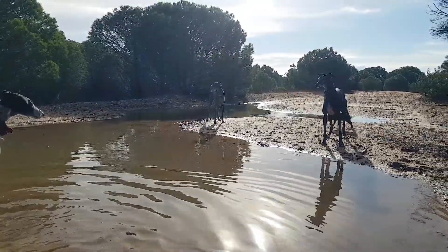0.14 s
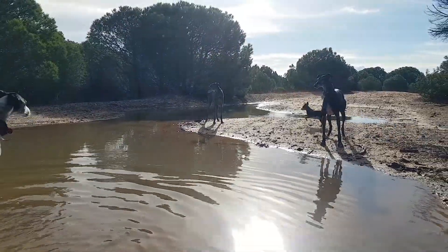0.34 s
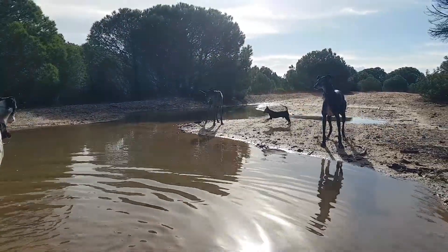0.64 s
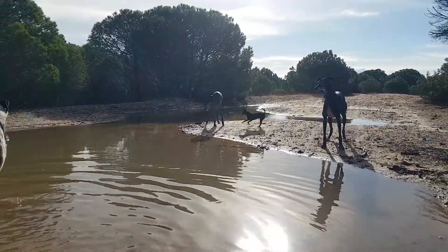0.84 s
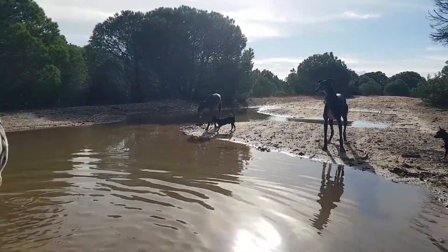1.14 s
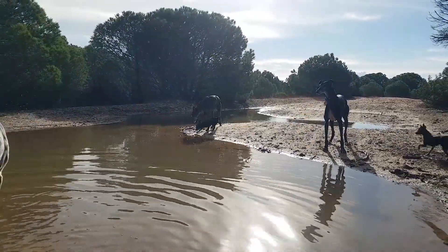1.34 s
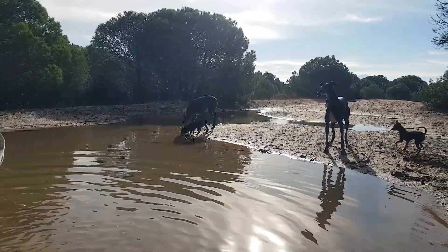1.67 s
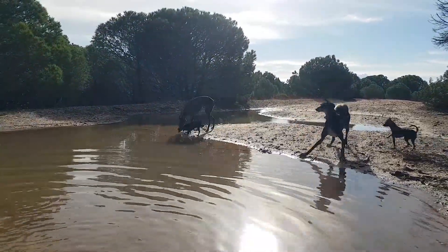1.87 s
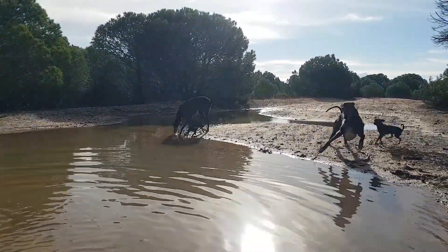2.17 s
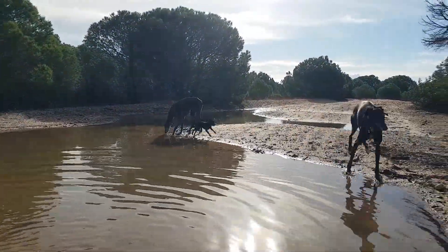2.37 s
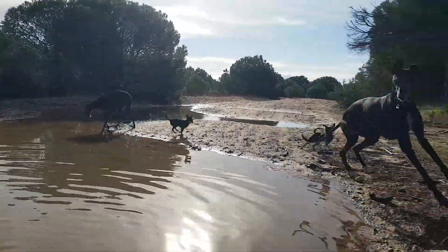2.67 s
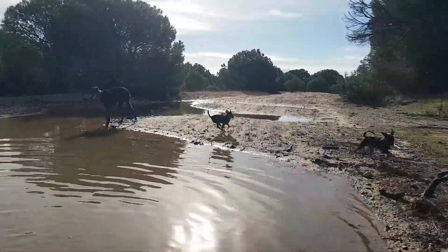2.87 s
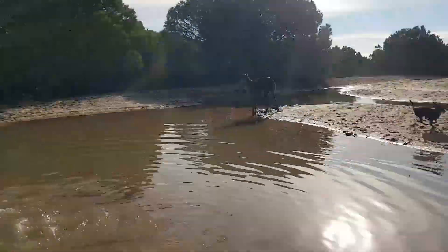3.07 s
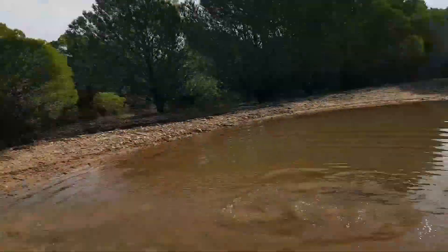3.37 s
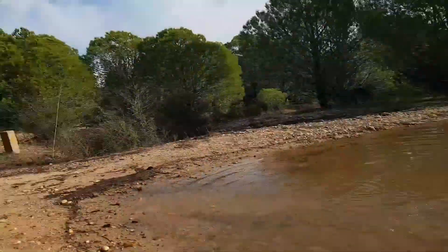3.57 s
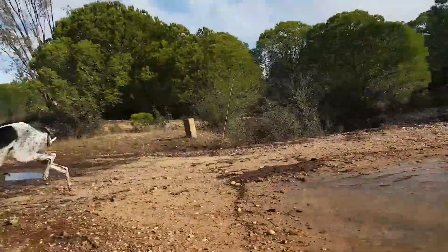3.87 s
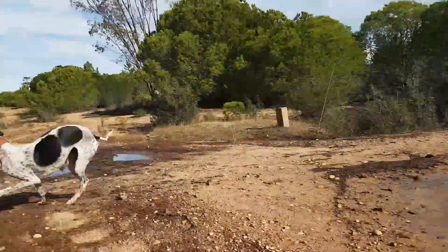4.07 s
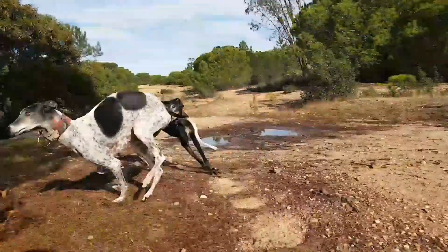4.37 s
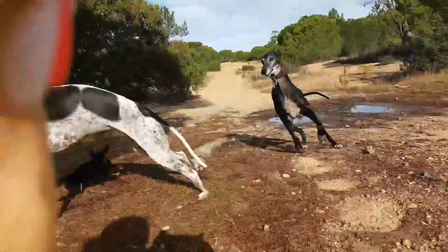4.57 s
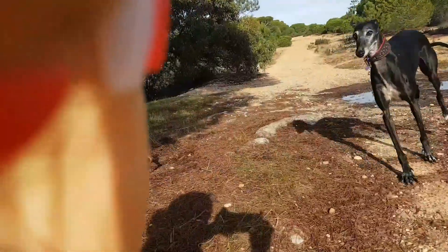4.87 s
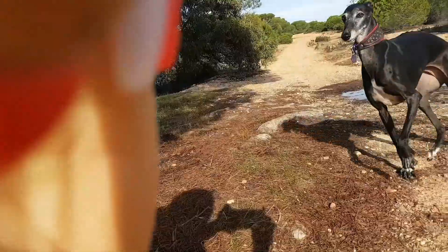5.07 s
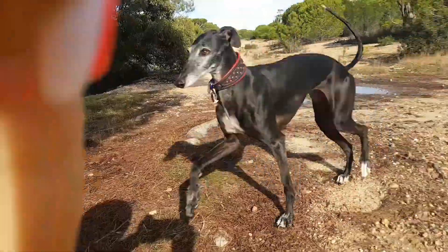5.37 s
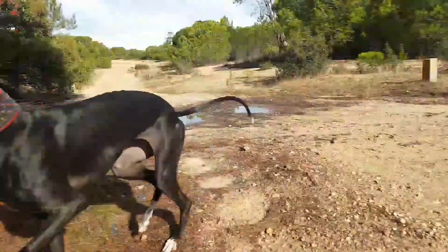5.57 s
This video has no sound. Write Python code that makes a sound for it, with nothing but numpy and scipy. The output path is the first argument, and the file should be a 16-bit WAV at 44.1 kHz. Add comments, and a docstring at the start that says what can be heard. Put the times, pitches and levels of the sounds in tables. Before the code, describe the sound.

A quiet open-air start with soft wind, then four dry lip smacks right at the microphone. A squealing yelp breaks out, followed by splashing paws, pattering drops, snapping grit and light metallic tag jingles. After a dull handling thump and rub on the left, the dog yelps three more times among low woofs, while jingling and footfalls thin out.

```python
"""A dog gives four high yelps, squeals that break out of a chest voice, and some gruff woofs.
Dogs play at a shallow puddle on sandy ground: paws slap, grit snaps, spray patters and collar tags jingle.
Four lip smacks beside the microphone call them, as fluttering grains that ring the modes of a mouth.
A finger bumps and rubs the left microphone port; light wind, made of coloured noise, rumbles underneath."""
import sys
import numpy as np
from scipy import signal
from scipy.fft import rfft, irfft, next_fast_len
from scipy.io import wavfile
from scipy.ndimage import uniform_filter1d

SR = 44100
rng = np.random.default_rng(int(sys.argv[2]) if len(sys.argv) > 2 else 0)


def put_to_file(sound):
    """Save the sound as 16-bit audio at rate SR, in the file named by the first command-line argument."""
    columns = np.atleast_2d(sound).T  # one column per channel
    safe = np.clip(columns, -1, 1)
    whole_steps = np.round(safe * 32767)
    wavfile.write(sys.argv[1], SR, whole_steps.astype(np.int16))


N = 252252
TIME = np.arange(N) / SR
SIDES = np.array([[.5], [-.5]])  # shares a left-right level difference between the ports

# Yelps that start in the chest, break into a squeal and arch in pitch:
# (time of the top [s], top pitch before any cling [Hz], rise [s], fall [s], cling to the throat resonance [0-1],
#  time of the break [s], burst at the break [dB], chest level [dB], chest pitch [Hz], chest roughness [0-1],
#  lower throat level [dB], upper throat level [dB], roughness [0-1], half-pitch share [0-1],
#  left lag [samples], left-right difference of the lower throat [dB])
YELP_EVENTS = [(2.15, 1691, .058, .058, 0, 2.117, 17, -41, 425, .6, -28, -19, .22, .15, 8, 2.5),
               (4.106, 1657, .04, .075, .8, 4.094, 4, -31, 354, .4, -18.5, -20.5, .06, 0.06, -17.5, 2.5),
               (4.474, 1351, .095, .066, 0, 4.467, 12, -30, 378, .05, -24, -31, .12, .5, -9.5, -0.5),
               (4.678, 1265, 0.077, 0.077, 0.01, 4.659, 1, -32, 402, .42, -18, -21.5, .06, .55, -13, -7)]
# Gruff woofs: (time of the peak [s], level [dB], rise [s], pitch at the peak [Hz],
#  mouth opening [factor on the chest resonance])
WOOF_EVENTS = [(.539, -42, 0.0083, 301.6, 1.16), (4.29, -31, 0.0083, 321, 1.33),
               (4.334, -39.5, .018, 276.5, 1.2), (4.554, -38.5, .022, 271.6, 0.92),
               (4.588, -36, .012, 313.4, 1.9), (4.995, -39, .04, 298.5, 1.3),
               (5.096, -42.5, 0.022, 240.2, 1.1), (5.645, -41, .016, 265.4, 1.07)]
WOOF_ROUGHNESS = 0.54  # 0-1


def dog(chest_mouth=1.1, return_mouth=1.4, woof_fall_s=0.035):
    """High yelps that break out of the chest voice and sink back into it, and low woofs."""
    out = np.zeros((2, N))
    for (top_s, top_hz, rise, fall, cling, break_s, burst_db, chest_db, chest_hz, chest_rough,
         low_db, high_db, rough, half, lag, pan_db) in YELP_EVENTS:
        # The chest voice peaks just before the break
        chest = woof(break_s - .012, chest_db, .6 * rise, 0.014, chest_hz, chest_rough, chest_mouth)
        add(out, *chest, lag)
        add(out, *squeal(top_s, top_hz, rise, fall, cling, break_s, burst_db,
                         low_db, high_db, rough, half, pan_db), lag)
        # It returns briefly, more quietly, late in the fall
        back = woof(top_s + .82 * fall, chest_db - 6, .012, .024, 330, WOOF_ROUGHNESS, return_mouth)
        add(out, *back, lag)
    yelp_times = [row[0] for row in YELP_EVENTS]
    yelp_lags = [row[-2] for row in YELP_EVENTS]
    for s, db, rise, hz, mouth in WOOF_EVENTS:
        lag = np.interp(s, yelp_times, yelp_lags)  # the same dog, on its way
        add(out, *woof(s, db, rise, woof_fall_s, hz, WOOF_ROUGHNESS, mouth), lag)
    return out


# Lower throat resonance: (frequency [Hz], gain [dB])
LOWER_THROAT = [(200, -26), (500, -4.5), (900, -1.5), (1250, 4), (1700, -3.5), (2000, -9.5), (2500, -36)]
# Upper throat resonance: (frequency [Hz], gain [dB])
UPPER_THROAT = [(1400, -55.5), (1900, -0.5), (2400, -1.5), (2900, 1), (3400, -1.5), (4100, -22.5),
                (5300, -22), (7000, -32.5), (15000, -48)]
# Air through the teeth: (frequency [Hz], gain [dB])
TEETH_RASP = [(2500, -24.5), (3500, 6.5), (4300, -8.5), (5400, -11.5), (6500, -11.5), (8000, -13.5),
              (15000, -19.5)]
CLING_HZ, CLING_RANGE_HZ = 1423, 251  # near this pitch the second harmonic locks to the upper throat
BREAK_S, HALF_PITCH_S = 0.0054, .028  # spread of the burst at the break, and of the half pitch round it


def squeal(top_s, top_hz, rise, fall, cling, break_s, burst_db, low_db, high_db, rough_top, half_top,
           pan_db, flutter_db=1.0, rasp_db=-25, high_pan_db=1.5, unbroken_db=-2):
    """A squeal that arches in pitch; the upper resonance takes over as the mouth opens."""
    t = np.arange(top_s - 1.2 * rise, top_s + 1.15 * fall, 1 / SR)
    u = (t - top_s) / np.where(t < top_s, rise, fall)  # -1 to 0 in the rise, 0 to 1 in the fall
    hz = top_hz * np.exp(-u ** 2)
    hz = hz - cling * (hz - CLING_HZ) * np.exp(-((hz - CLING_HZ) / CLING_RANGE_HZ) ** 2)

    since_break = t - break_s
    unbroken = .5 - .5 * np.tanh(since_break / BREAK_S + 1)
    # Rough before the break, and again as the breath runs out
    rough = np.clip(rough_top + .6 * unbroken + .65 * np.maximum(u, 0) ** 2, 0, 1)
    half = half_top * np.exp(-(since_break / HALF_PITCH_S) ** 2)
    clean, puffs = folds(hz, rough, half, count=4)

    # The voice swells as its first or second harmonic crosses a resonance
    burst = burst_db * np.exp(-(since_break / BREAK_S) ** 2)
    low_fade = 18 * np.abs(u) ** 1.4
    lower = amp(low_db - low_fade + boost(hz, centre_hz=1270, width=170, db=5) + burst)
    # The mouth is widest part-way into the fall; the upper throat fades on both sides
    open_at = .3
    high_fade = np.where(u < open_at, 19, 70) * (u - open_at) ** 2
    upper = amp(high_db + boost(2 * hz, centre_hz=2810, width=270, db=9.5) - high_fade)

    low_voice = lower * voiced(clean, puffs, rough, LOWER_THROAT) * amp(SIDES * pan_db)
    high_voice = upper * voiced(clean, puffs, rough, UPPER_THROAT) * amp(SIDES * high_pan_db)
    rasp = np.hypot(lower, upper) * amp(rasp_db) * unit(colour(puffs, TEETH_RASP))
    flutter = amp(flutter_db * wander(len(t), 200) + unbroken_db * unbroken)
    return t[0], (low_voice + high_voice + rasp) * flutter * signal.windows.tukey(len(t), .08)


# Chest resonance at mouth opening 1: (frequency [Hz], gain [dB])
CHEST_RESONANCE = [(120, -2), (250, -3.5), (380, 3), (600, -1.5), (900, -12), (1500, -16.5), (2300, -18),
                   (4000, -35.5), (8000, -60)]


def woof(s, db, rise, fall, hz, rough, mouth, lift=0.0999):
    """The chest voice: its pitch lifts a little with effort."""
    effort = swell(rise, fall)
    clean, puffs = folds(hz * (1 - lift + lift * effort), rough, 0, slope=0.41)
    throat = np.multiply(CHEST_RESONANCE, [mouth, 1])
    return s - 2 * rise, amp(db) * effort * voiced(clean, puffs, rough, throat)


def folds(hz, rough, half, jitter=.05, slope=1.0, count=8):
    """Vocal fold pulses and puffs of air: roughness makes cycles uneven, the half pitch pairs them strong-weak."""
    n = len(hz)
    turns = np.cumsum(hz * (1 + jitter * rough * wander(n, 500.4))) / SR

    def harmonics(numbers):
        return sum(np.cos(2 * np.pi * k * turns) / k ** slope for k in numbers)

    clean = harmonics(np.arange(1, count + 1)) + half * harmonics(np.arange(1.5, count))
    puffs = (1 + 0.8 * np.cos(2 * np.pi * turns)) * rng.standard_normal(n)
    return clean, puffs


def voiced(clean, puffs, rough, throat):
    """Pulses and air pass one throat resonance, at steady strength."""
    tone = colour(clean, throat)
    tone /= np.sqrt(np.abs(uniform_filter1d(tone ** 2, size=300)) + 1e-9)
    air = unit(colour(puffs, throat))
    r = np.clip(rough, 0, 1) ** 1.3
    return ((1 - r) * tone + r * air) / np.hypot(1 - r, r)


def boost(hz, centre_hz, width, db):
    """Decibels that a harmonic gains near a throat resonance."""
    return db * np.exp(-((hz - centre_hz) / width) ** 2)


# Paws slap into wet sand and water, levels before trim:
# (time of the peak [s], level [dB], length [s], centre [Hz], level of the low plop [dB])
PAW_SLAPS = [(2.294, -39.5, 0.052, 1200, -42), (2.376, -36, .025, 1500, -40.5),
             (2.412, -28, .019, 2180, -36.5), (2.455, -35.5, 0.044, 2660, -55),
             (2.563, -28.5, .07, 2120, -54), (2.749, -31, .055, 2130, -35), (2.808, -30, .041, 1890, -41.5),
             (2.915, -32, 0.088, 1880, -41), (3.054, -39.5, .06, 2050, -53), (3.135, -39.5, .05, 1580, -54),
             (3.705, -43, .042, 2400, -40.5), (5.0, -37.5, .055, 1530, -41), (5.337, -44, 0.031, 2290, -64),
             (5.57, -52, .033, 2210, -65)]
# Grit snaps under a paw, levels before trim: (time [s], crack level [dB], knock level [dB])
GRIT_SNAPS = [(1.3413, -52, -54), (2.4094, -40, -26), (2.5295, -30, -26.5), (2.5614, -36, -30),
              (2.8704, -28.5, -27), (3.0578, -23, -45), (3.074, -18, -32), (3.697, -25.5, -38),
              (4.582, -11, -42), (4.805, -25.5, -35.5), (4.9404, -33.5, -44), (5.0615, -36, -44),
              (5.4945, -25.5, -52.5)]


def paws(snap_db=-5, knock_db=0, snap_s=0.0038, slap_db=-2, plop_hz=600):
    """Each footfall throws a clump of drops and sand and traps a pocket of air; now and then grit snaps."""
    out, t = np.zeros((2, N)), np.arange(2000) / SR
    for s, db, length, hz, plop_db in PAW_SLAPS:
        rise = .3 * length
        push = swell(rise, length - rise)
        patter = grains(len(push), 1500, 3.0)
        drops = colour(patter, [(hz / 7, -18), (hz / 2, -6), (hz, 0), (hz * 1.46, -6), (hz * 5, -24)])
        wet = lumpy(pair(unit(drops), .7), 4.0) + .8 * bubbles(len(push), hz)
        plop = bubbles(len(push), plop_hz, per_s=350, cycles=4.5, glide=0.021)
        add(out, s - 2 * rise, push * (amp(db + slap_db) * wet + amp(plop_db) * plop), -18)
    for s, crack_db, low_db in GRIT_SNAPS:
        grit = rng.standard_normal((2, len(t)))
        crack = unit(colour(grit, [(1500, -23.5), (4000, -1), (7000, 9.0), (15000, 3.5)]))
        knock = unit(resonate(grit, 1800, 2200))
        shape = np.exp(-t / snap_s) * (1 - np.exp(-t / 0.00046))
        snap = amp(crack_db + snap_db) * crack + amp(low_db + knock_db) * knock
        add(out, s, pair(snap, 0.38) * shape, -18)
    return out


# Collar tags knock together, levels before trim and chance:
# (time [s], tick level [dB], ring of the large tag [dB], ring of the small tag [dB])
TAG_KNOCKS = [(2.3615, -15, -39, -50), (2.5011, -11, -40, -46), (2.6409, -15, -41, -50),
              (2.7167, -8, -44, -41), (2.827, -21, -35, -61), (2.9647, -24, -56, -31),
              (3.0735, -21, -29, -39), (3.0961, -4.5, -26, -36), (3.2101, -13.5, -48, -53),
              (3.3456, -13, -31.5, -55), (3.4364, -22, -51, -38), (3.4793, -9.5, -31.5, -44.5),
              (3.7549, -11, -25.5, -36), (3.805, -37, -32, -52), (4.0715, -17.5, -39, -51),
              (4.9847, -19, -55, -57), (5.1924, -25, -54, -72), (5.4291, -22.5, -36.5, -67.5),
              (5.4948, -20, -45, -52)]
# Ringing modes of the two tags: (frequency before chance detuning [Hz], level [dB], t60 [s])
TAG_RINGS = [(7545, -2.5, 0.097), (7830, 6.5, 0.058), (9150, 0, .05), (9500, -1.5, 0.14), (9660, 0.5, 0.1),
             (10620, -13.5, 0.094), (12850, -6.5, 0.072), (13050, -9.5, .08), (14550, -13, .06),
             (15600, -7.5, .06)]


def collar(low_db=0, high_db=0, tick_db=-14, tick_s=.005, rattle_s=0.0022, pan_db=2.0):
    """Two metal tags chatter together for a moment; their close modes ring differently at every knock."""
    out, t = np.zeros((2, N)), np.arange(9000) / SR
    hz, mode_db, t60 = np.transpose(TAG_RINGS)[:, :, None]
    one_each = (len(hz), 1)
    for s, db, large_db, small_db in [*TAG_KNOCKS, *jostles()]:
        strength = np.where(hz < 8500, large_db + low_db, small_db + high_db)
        strength = strength + 2 * rng.standard_normal(one_each)
        detune = 1 + 0.0017 * rng.standard_normal(one_each)
        turns = hz * t * detune + rng.random((2, *one_each))
        modes = amp(strength + mode_db - 60 * t / t60) * np.sin(2 * np.pi * turns)
        ring = modes.sum(1) * (1 - np.exp(-t / rattle_s))
        ring *= 1 + .5 * wander(len(t), 250)  # the swinging tags keep touching
        tick = unit(colour(grains(len(t), 6000, 1.2), FINE_COLOUR))
        tick = tick * np.exp(-t / tick_s) * (1 - np.exp(-t / 0.001))
        add(out, s, ring + amp(db + tick_db) * tick, 0, pan_db)
    return out


def jostles(count=24, start_s=2.4, end_s=5.65, jitter_s=.04, spread_db=3.5):
    """While the dogs run, the tags keep touching lightly at uneven moments."""
    chance = rng.standard_normal((count, 4))
    times = np.linspace(start_s, end_s, count) + jitter_s * chance[:, 0]
    levels = np.add((-27, -59, -59), spread_db * chance[:, 1:])  # tick, large tag, small tag
    return np.column_stack([times, levels])


# Lip smacks: (time [s], relative level [dB], length [s], mouth size [factor on its resonances],
#  hiss relative to the ring [dB])
LIP_SMACKS = [(1.4267, -20, 0.011, 0.94, -17.5), (1.594, -21, 0.012, 0.95, -19.5),
              (1.7288, -17.5, 0.017, 0.95, -16), (1.8866, -18.5, 0.031, 0.89, -14)]
# Resonances of the mouth at size 1: (frequency [Hz], width, doubled in each of two passes [Hz], gain [dB])
MOUTH_MODES = [(766, 450, -13), (1670, 590, -4.5), (2390, 530, 3), (3790, 310, 6), (4320, 470, 9),
               (5590, 680, 4.5), (6073, 435, 4.5), (7200, 2360, -13.5)]


def smacks(tail_db=-15, tail_s=0.002):
    """Sucked lips flutter for a moment and ring the small cavity of the mouth."""
    out, t = np.zeros((2, N)), np.arange(-.008, .05, 1 / SR)
    for s, db, length, size, air_db in LIP_SMACKS:
        moments = [-.008, -.003, 0, .0012, length * 0.51, length + 0.00085, length + 7 * tail_s]
        shape = np.interp(t, moments, [-45, -24, -11, 1.5, -2, tail_db, -70])
        flutter = grains(len(t), 9000, 1.4) * amp(shape)
        ring = 0
        for hz, width, mode_db in MOUTH_MODES:
            once = resonate(flutter, hz * size, 2 * width)
            ring = ring + amp(mode_db) * resonate(once, hz * size, 2 * width)
        sound = unit(ring) + amp(air_db) * unit(flutter)
        strength = amp(db) * np.sqrt(length * SR / len(t))  # level over the smack's own length
        add(out, s + t[0], strength * pair(sound, 0.63), 7, 2.2)
    return out


# A finger bumps the left port: (time [s], approximate peak level [dB])
PORT_BUMPS = [(3.536, -12), (3.5562, -22.5), (3.5821, -22), (3.601, -13.5), (3.6066, -18.5)]
# The finger slides: (time of the peak [s], level [dB], rise [s], fall [s])
PORT_RUBS = [(3.537, -30.5, 0.0041, 0.015), (3.605, -25, .016, .028), (3.67, -41, .04, 0.13)]
# Spectrum of the rubbing: (frequency [Hz], density [dB per Hz])
RUB_SPECTRUM = [(35, -43), (60, -10), (463, -8), (540, -2.5), (1060, -14), (1280, -8.5), (2080, -20),
                (2330, -12.5), (6000, -30), (7800, -55), (13200, -120)]


def finger(right_db=-27, bump_width_s=0.00054):
    """A fingertip pushes air into the left port and drags across it; the right port hears it faintly."""
    out, t = np.zeros((2, N)), np.arange(-.004, .004, 1 / SR)
    u = t / bump_width_s
    for s, db in PORT_BUMPS:
        add(out, s + t[0], -1.5 * amp(db) * np.tanh(4 * u) * np.exp(-np.abs(u)))
    for s, db, rise, fall in PORT_RUBS:
        press = swell(rise, fall)
        drag = unit(colour(grains(len(press), 2500, 1.5)[0], RUB_SPECTRUM))
        add(out, s - 2 * rise, amp(db) * press * drag)
    return out * amp([[0], [right_db]])


# Spray and kicked sand swell as the dogs run past, levels before trim:
# (time [s], body level [dB], fizz level [dB])
SPRAY_LEVELS = [(0.0, -71.5, -76), (0.48, -77, -79), (1.72, -68.5, -73.5), (2.04, -57.5, -57.5),
                (2.17, -45, -47), (2.28, -51, -67), (2.42, -44.5, -54), (3.0, -42.5, -46.5),
                (3.4, -49, -47), (3.9, -53, -54.5), (4.17, -59.5, -58.5), (4.55, -49, -53.5),
                (4.87, -54.5, -46.5), (5.03, -62.5, -61.5), (5.72, -60, -60)]
# Spectrum of the coarse patter: (frequency [Hz], density [dB per Hz])
COARSE_COLOUR = [(250, -12.5), (450, -14.5), (700, -1), (1300, -19), (2100, 4.5), (3200, -1), (5500, -7),
                 (7400, -2.5), (9000, -21.5), (16000, -34.5)]
# Spectrum of the fine fizz, shared with the tick of the tags: (frequency [Hz], density [dB per Hz])
FINE_COLOUR = [(3000, -17), (6000, -2), (8000, -3.5), (11000, -7.5), (15500, -2)]


def spray(body_db=1, fizz_db=2, clump_db=2.0):
    """Drops and sand grains patter down in clumps behind the running dogs; some drops plink in the puddle."""
    s, body, fizz = np.transpose(SPRAY_LEVELS)
    clumps = clump_db * wander(N, 70)
    patter = pair(unit(colour(grains(N, 4000, 2.6), COARSE_COLOUR)), 0.19)
    plinks = .5 * bubbles(N, 2300, per_s=300, cycles=10)
    coarse = (patter + plinks) * amp(np.interp(TIME, s, body) + body_db + clumps)
    fine = unit(colour(grains(N, 9000, 3.1), FINE_COLOUR))
    fine = fine * amp(np.interp(TIME, s, fizz) + fizz_db + clumps)
    out = np.zeros((2, N))
    add(out, 0, lumpy(coarse, 4.0), -18, .8)
    add(out, 0, pair(fine, .2), -18, -1.5)
    return out


def bubbles(n, hz, per_s=260, cycles=11, glide=.06, count=14):
    """Air pockets of many sizes pop in the water, each a short ring that rises in pitch."""
    out = np.zeros(n)
    sizes_hz = hz * np.geomspace(.35, 2.2, count) * rng.uniform(.9, 1.1, count)
    for f in np.clip(sizes_hz, 100, 12000):
        u = np.arange(0, 5, f / cycles / SR)  # time in decay constants
        ring = np.exp(-u) * (1 - np.exp(-8 * u)) * np.sin(2 * np.pi * cycles * u * (1 + glide * u))
        pops = (rng.random(n) < per_s / count / SR) * rng.uniform(0.29, 1, n)
        out += signal.fftconvolve(pops, ring)[:n] * min(f / hz, hz / f) ** .5
    return unit(out)


def lumpy(x, depth_db):
    """Blobs of water of changing size: each favours its own band for a few hundredths of a second."""
    z = signal.stft(x, nperseg=256, noverlap=192)[2]
    chance = rng.standard_normal(z.shape[1:])
    blobs = unit(uniform_filter1d(uniform_filter1d(chance, size=4, axis=0), size=14, axis=1))
    z = z * unit(amp(depth_db * blobs))
    return signal.istft(z, nperseg=256, noverlap=192)[1][:, :x.shape[1]]


# The breeze freshens, level before trim: (time [s], level [dB])
WIND_LEVELS = [(0.0, -53.5), (0.32, -59), (1.34, -57), (2.66, -51.5), (4.08, -51), (4.5, -49),
               (4.66, -52.5), (5.72, -50.5)]
# Spectrum of the wind: (frequency [Hz], density [dB per Hz])
WIND_SPECTRUM = [(20, -22), (35, -14.5), (70, -2), (200, 0.5), (300, -3.5), (430, -11), (700, -10.5),
                 (1000, -21), (1500, -26), (3000, -39.5), (6000, -46), (15000, -44.5)]


def wind(level_db=2.5):
    """Moving air rumbles low, nearly the same at both ports, and its strength wavers a little."""
    air = pair(unit(colour(rng.standard_normal((2, N)), WIND_SPECTRUM)), 0.93)
    level = np.interp(TIME, *np.transpose(WIND_LEVELS)) + level_db + .5 * wander(N, 12)
    return air * amp(level) * amp(SIDES)


# Die-away of the tail from the trees: (frequency [Hz], t60 [s])
TREE_DECAY = [(200, .4), (1200, 0.5), (3000, 0.46), (6000, 0.75), (15000, 0.34)]


def outdoors(x, ground_db=-17, trees_db=-25, ground_s=0.016):
    """Quick scatter from the ground and bodies, then a faint tail from the trees."""
    n = 32768
    hz, t, z = signal.stft(grains(n, 2500, 0.74), SR, nperseg=256)
    decay = amp(-60 * t / read(TREE_DECAY, hz)[:, None])
    tail = signal.istft(z * decay, SR, nperseg=256)[1][:, :n]
    t = np.arange(n) / SR
    near = colour(grains(n, 3000, 0.94), [(1000, -1.5), (3500, 1), (6000, -6), (15000, -40.5)])
    near = near * np.exp(-t / ground_s) * (t > .002)
    echo = (amp(ground_db) * unit(near) + amp(trees_db) * unit(tail * (t > .015))) / np.sqrt(n)
    return signal.fftconvolve(x, echo, axes=1)[:, :N]


def amp(db):
    """Decibels to gain."""
    return 10 ** (np.asarray(db) / 20)


def unit(x):
    """Scales to rms 1."""
    return x / np.sqrt(np.mean(x ** 2) + 1e-20)


def read(points, hz):
    """Reads a curve on a log-frequency axis."""
    f, value = np.transpose(points)
    return np.interp(np.log(hz + 1), np.log(f + 1), value)


def colour(x, points):
    """Filters by a spectrum in dB."""
    n = x.shape[-1]
    size = next_fast_len(n + 512)
    gain = amp(read(points, np.fft.rfftfreq(size, 1 / SR)))
    return irfft(rfft(x, size) * gain, size)[..., :n]


def resonate(x, hz, width):
    """A fixed resonance with a gain of 1 at its peak."""
    return signal.lfilter(*signal.iirpeak(min(hz, SR / 2 - 500), hz / width, fs=SR), x)


def add(mix, s, sound, lag=0, pan_db=0):
    """Adds a sound at time s; it reaches the left port lag samples after the right."""
    both = np.broadcast_to(sound, (2, sound.shape[-1]))
    for channel, (one, side) in enumerate(zip(both, (1, -1))):
        start = max(0, round(s * SR + side * lag / 2))
        part = mix[channel, start:][:len(one)]
        part += amp(side * pan_db / 2) * one[:len(part)]


def pair(z, likeness):
    """Makes two unrelated signals partly alike."""
    c = np.clip(likeness, 0, 1)
    return np.array([z[0], c * z[0] + np.sqrt(1 - c * c) * z[1]])


def grains(n, per_s, spread_db):
    """Random clicks of very unequal size, for both ports."""
    size = amp(spread_db * np.minimum(rng.exponential(1, (2, n)), 4))
    return unit(size * rng.standard_normal((2, n)) * (rng.random((2, n)) < per_s / SR))


def wander(n, per_s):
    """Chance drift: straight lines between random points of spread 1, per_s points a second."""
    return np.interp(np.arange(n) * per_s / SR, np.arange(8000), rng.standard_normal(8000))


def swell(rise, fall):
    """A rounded rise and die-away that peaks at 1, two rises after its start."""
    t = np.arange(-2 * rise, 3 * fall, 1 / SR)
    return np.exp(-2 * np.where(t < 0, (t / rise) ** 2, np.abs(t / fall) ** 1.35))


def scene():
    """The dogs stand out in the open; the lips and the finger are right at the microphone."""
    far = dog() + paws() + collar()
    lips = smacks()
    echoes = outdoors(far + amp(-16) * lips)
    return far + lips + echoes + spray() + finger() + wind()


def record(dry, edge_hz=16000):
    """A linear-phase low-pass limits the treble."""
    lowpass = signal.firwin(511, edge_hz, window=("kaiser", 9), fs=SR)
    return signal.oaconvolve(dry, lowpass[None], "same")


dry = scene()
out = record(dry)
put_to_file(out)
```